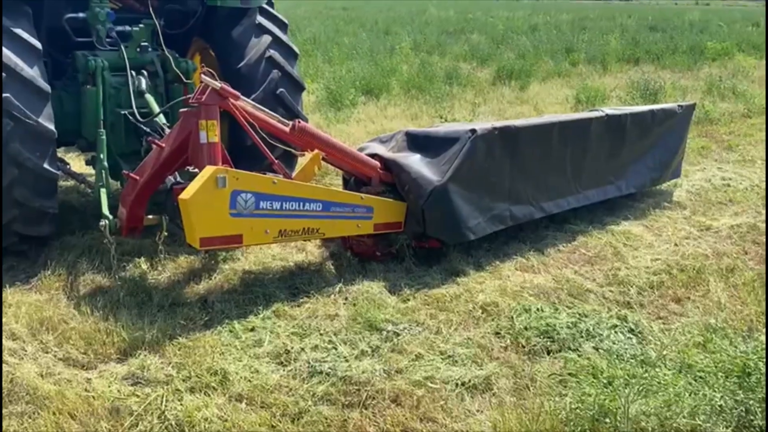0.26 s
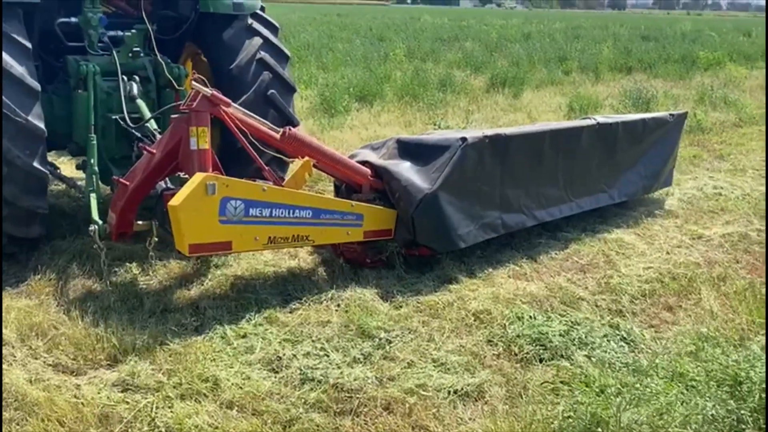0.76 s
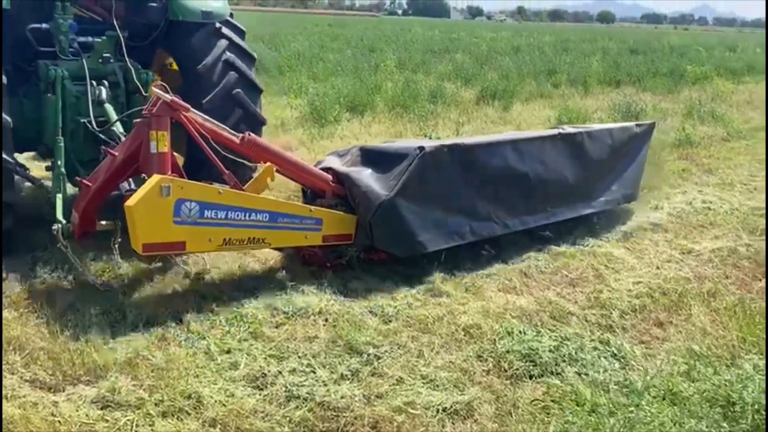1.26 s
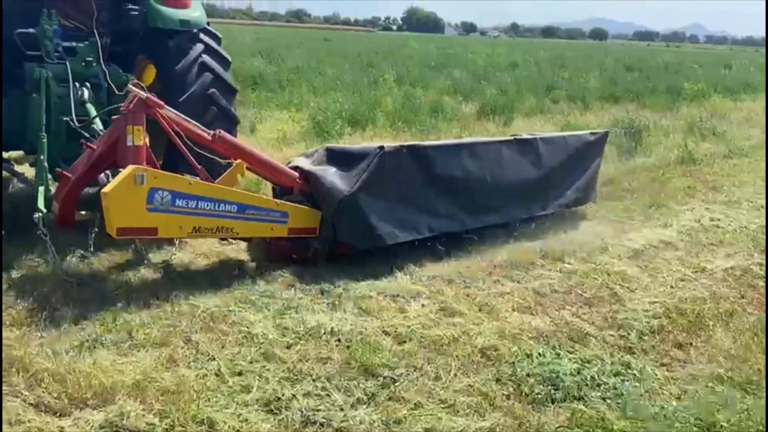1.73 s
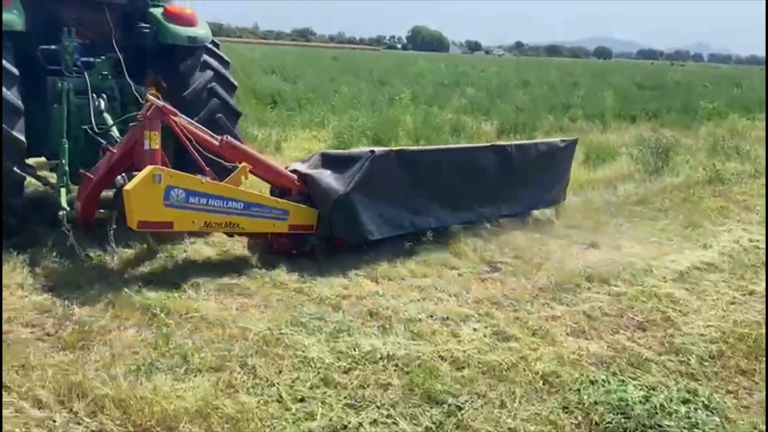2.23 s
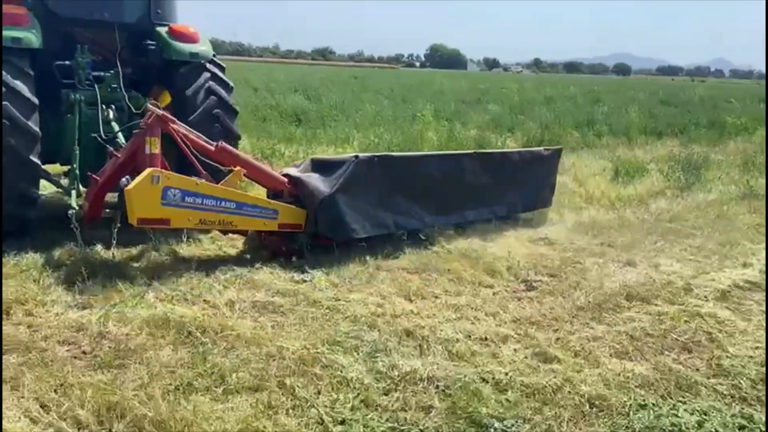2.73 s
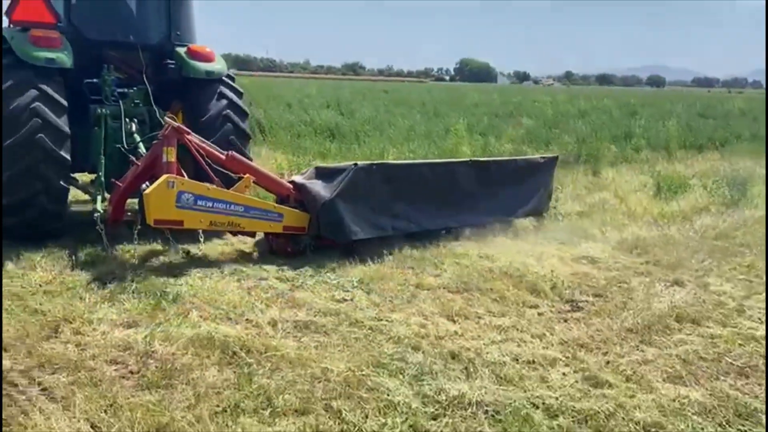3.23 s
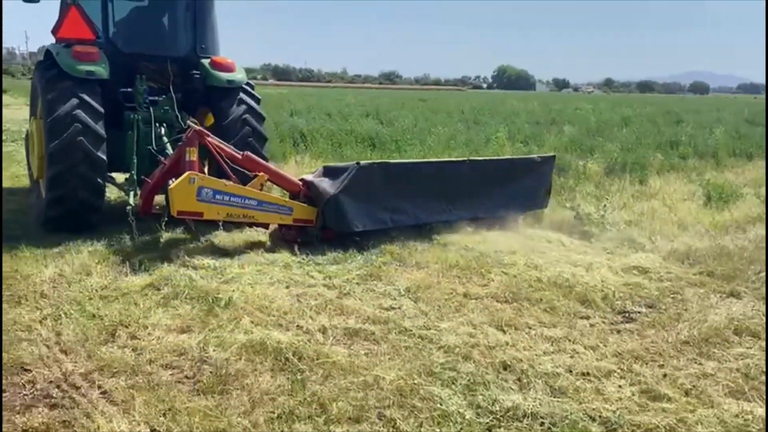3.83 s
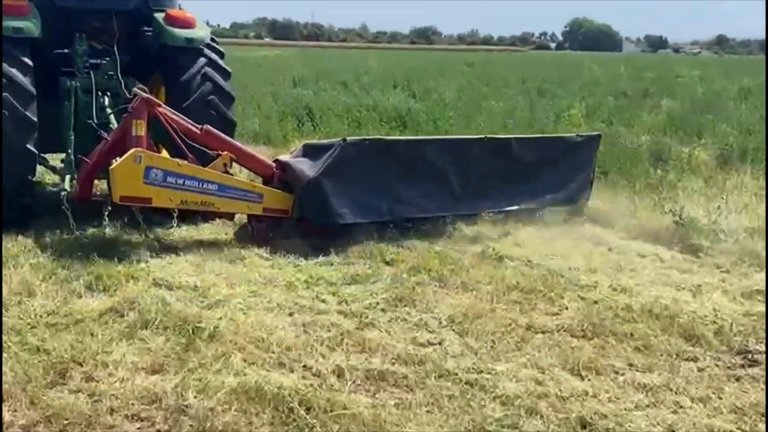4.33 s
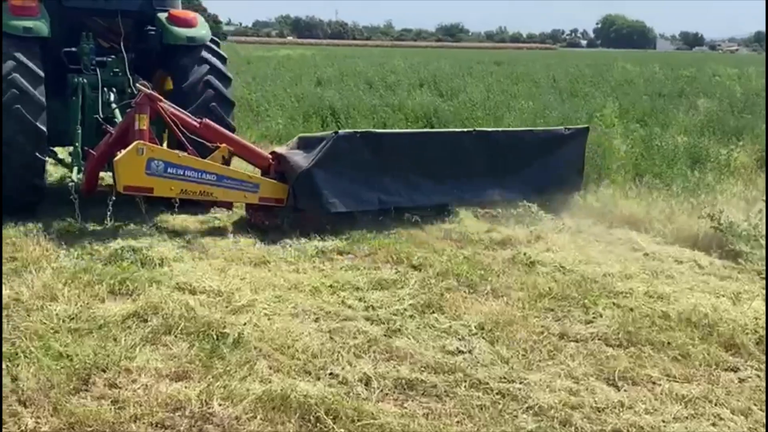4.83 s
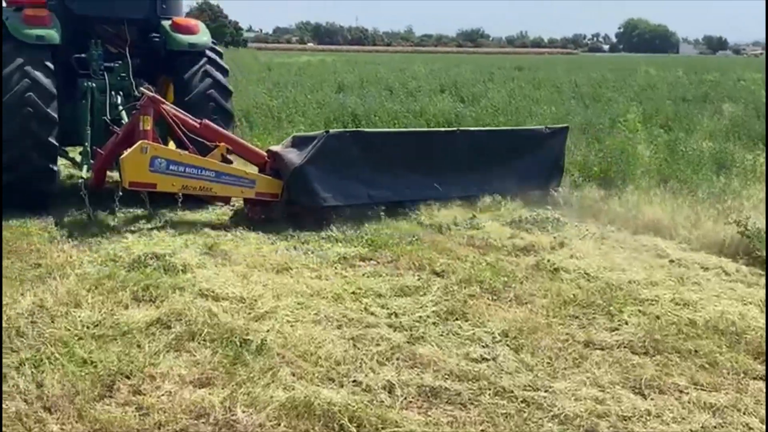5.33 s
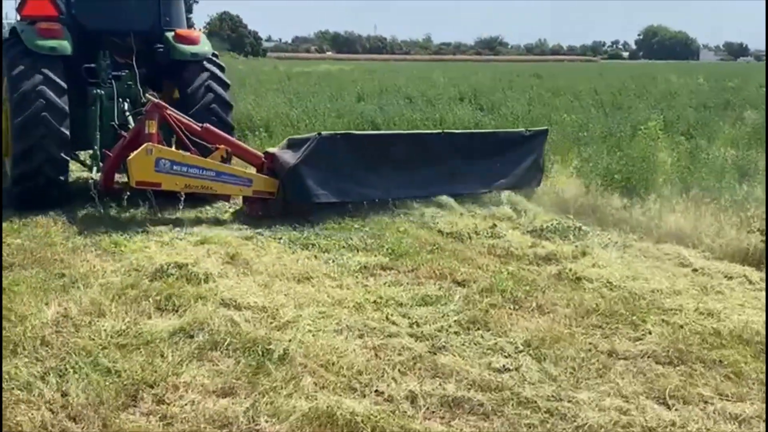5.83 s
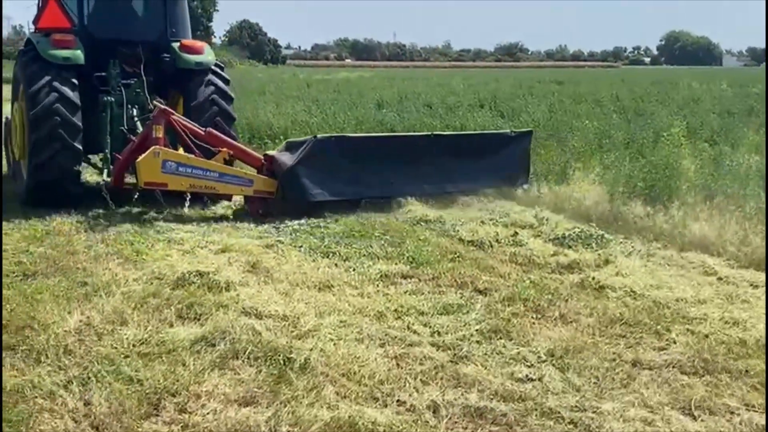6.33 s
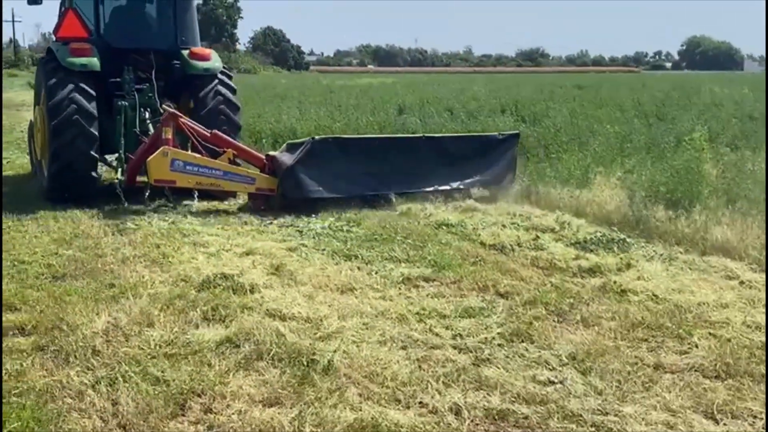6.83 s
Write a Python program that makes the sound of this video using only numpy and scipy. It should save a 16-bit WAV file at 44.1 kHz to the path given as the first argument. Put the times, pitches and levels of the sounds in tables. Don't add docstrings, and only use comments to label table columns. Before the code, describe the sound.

Continuous farm machinery noise outdoors, dry and close at first. Spinning knives beat low under a canvas hood, a muffled diesel exhaust drones, and gear teeth whine with a grainy, beating rattle. Pitch rises quickly, dips briefly near one second, then surges again before two seconds and holds. Skids scrape faintly over the ground and cut crop hisses. The mower slowly recedes, stereo narrowing after four seconds, through a phone microphone with limited highs.

```python
import sys
import numpy as np
from scipy import signal
from scipy.io import wavfile
from scipy.ndimage import uniform_filter1d, map_coordinates

SR = 44100
rng = np.random.default_rng(int(sys.argv[2]) if len(sys.argv) > 2 else 0)


def natural_amplitude(level_db):
    exponent = np.asarray(level_db, float) / 20
    return 10 ** exponent


def transcribe(signal):
    frames = np.atleast_2d(signal).T
    limited = np.clip(frames, -1, 1)
    pcm = np.round(limited * 32767).astype(np.int16)
    wavfile.write(sys.argv[1], SR, pcm)


N = 311346

# start_s, knife_pass_hz, firing_hz
THROTTLE = [(0, 49.5, 36.8), (.15, 52.5, 36.8), (.3, 54.6, 39.2), (.45, 57.7, 42.3), (.55, 60, 42.4),
            (.75, 61.7, 42.1), (.9, 61.1, 41.6), (1.15, 58.5, 40.9), (1.3, 59.2, 41.2), (1.45, 60, 44.4),
            (1.6, 63.7, 48.2), (1.75, 67.6, 50.5), (1.95, 73, 51.3), (2.15, 74.5, 52.3), (2.35, 75.4, 52),
            (2.65, 74.5, 51.8), (2.9, 74.7, 52), (3.1, 75.4, 52.1), (3.55, 74.6, 52), (3.85, 75.1, 52.3),
            (4.3, 75.3, 52.6), (4.72, 77.1, 53.7), (5.0, 76.7, 53.2), (5.2, 77, 53.8), (5.55, 78.3, 54.3),
            (5.8, 77.9, 54.4), (6.15, 79.6, 55.4), (6.55, 79.8, 55.5), (7.06, 81.2, 56.4)]
# start_s, load_db, bite_db, crop_db
WORK = [(0, 0.5, 1, 3.5), (.15, 1, 6, 4), (.33, 4, 8, 0), (.5, 0, 10, 3.5), (.75, 1, 7.5, 1),
        (.9, -1.5, 2, -1.5), (1.1, -2.5, 5, -1.5), (1.22, 0, -14, -2), (1.43, 0.5, 1.5, 0),
        (1.65, 1.2, -8, -1), (1.8, 1.5, 4, 0.5), (2.2, 0.5, 6, -0.5), (2.9, 0, 4, -0.7),
        (3.5, 0.6, 4, -1.5), (4.1, 0.5, 1, 0), (4.7, 0.3, 9, 1.5), (5.8, 0.8, 0.5, 0.3),
        (7.06, 2, 8.5, -4.5)]
NEAREST_M, LEAVES_S, DRIVES_M_S = 3.7, 1.78, 0.7
LOW_LOSS = 0.13

# multiple_of_knife_rate, level_db
UPPER_BEATS = [(2.182, -56), (3, -49), (4, -49), (5, -49), (6, -48), (8, -51)]
# pitch_hz, level_db
CANVAS = [(49, -37), (56, -42), (60, -32.5), (66, -30.5), (75, -25), (82, -28.5), (118, -35), (150, -38.5)]
HOOD_HZ, HOOD_RING_DB, HOOD_RING_HZ = 178., 12.5, 10.

MESH, PUMP, IDLER = 12.5, 18.1, 8.84
WOBBLE = .182
PUMP_DB, PUMP_SWING_DB = -40, 2.5
# steady_share_0_to_1, line_db, rattle_skirt_db, skirt_width_hz
TEETH = [
    (.05, -14, -4.5, 280.),
    (.1, -5, -3, 260.),
    (.05, -9, 3, 500.),
]
# level_db, then shares (dB per dB) of load, bite, crop, distance loss
MESH_LAW = [
    (-29, 0.24, 0.8, 0, 1.8),
    (-32.5, 0.45, 0.19, 0, 1.83),
    (-36.5, 0.95, 0.056, 0.0084, 0.18),
]
# pitch_hz, level_db
BAR = [(600, -1.5), (760, -1), (950, -0.5), (1250, -2), (1600, -1), (1850, -3.5), (2350, 3), (2800, -2)]
# start_s, line_one_shaft_turn_below_db, centre_db, line_above_db
SPLIT = [(0, -42, -36, -39), (.4, -42, -34, -36), (.65, -37, -32, -33), (.9, -39, -35, -38),
         (1.15, -45, -42, -44), (1.4, -44, -43, -41), (1.65, -39, -46, -37), (1.9, -36, -41, -34),
         (2.15, -40, -41, -35), (2.4, -40, -41, -34), (2.65, -41, -40, -38), (2.9, -47, -38, -41),
         (3.15, -42, -34, -41), (3.4, -38, -38, -39), (3.65, -45, -36, -37), (4.15, -45, -38, -39),
         (4.4, -42, -34, -43), (4.9, -37, -32, -43), (5.15, -44, -34, -38), (5.4, -46, -36, -40),
         (5.65, -46, -38, -40), (5.9, -40, -37, -37), (6.15, -40, -44, -40), (6.4, -41, -48, -43),
         (6.65, -43, -44, -37), (7.06, -39, -42, -39)]
# centre_s, length_s, level_db,
# teeth_per_knife_pass, smear_hz
SINGS = [(.22, .1, -31.5, 18.182, 10), (.48, .18, -33, 18.182, 7), (.75, .17, -33, 18.364, 7),
         (1.45, .22, -34.5, 18.182, 12), (2.6, .25, -39, 18.182, 6), (3.7, .4, -41, 18, 6),
         (3.5, .5, -43, 18.182, 6), (4.5, .25, -47, 18.182, 6), (.75, .25, -38, 8.9, 25),
         (1.9, .15, -40, 9, 9), (3.5, .5, -44, 9, 6), (6, .5, -47, 9, 6), (6.3, .7, -48, 9.182, 6),
         (2.35, .4, -37, 11.5, 6), (3.2, .35, -42, 11.5, 7), (.8, .25, -42, 13.5, 9),
         (1.4, .15, -43, 13.5, 9), (3.65, .5, -35.5, 13.5, 6), (4.3, .25, -38, 13.5, 7),
         (3.3, .5, -41, 13.046, 7), (3.7, .3, -41, 12.864, 7), (1.9, .2, -38, 12.864, 9),
         (2.55, .55, -42, 6, 6), (3.9, .5, -48, 6, 6), (.2, .2, -35.5, 4, 7), (6.7, .5, -47, 4, 6),
         (3.5, .5, -41, 25, 12), (.6, .2, -39, 25, 60), (1.9, .15, -43, 8, 9), (1.8, .12, -33, 2.55, 25),
         (2.7, .6, -42, 25, 80), (2.6, .3, -41, 37.5, 120), (1.551, 0.27, -28, 37.5, 930),
         (1.8, 0.17, -32.5, 28, 200), (1.85, .25, -36, 25, 120)]
STRAND_DB, STRAND_HZ, STRAND_RATE = 2.2, 110., 14.

# pitch_hz, level_db
PIPE = [(36, -39), (47, -29.5), (54, -32), (72, -33.5), (78, -24), (83, -31.5), (90, -28.5), (99, -28),
        (105, -47)]

# centre_s, length_s, level_db, pitch_hz
SCRAPES = [
    (1.75, 0.03, -33, 430),
    (1.84, 0.1, -32, 590.),
    (3.4, 0.46, -30.5, 1070),
    (4.1, 0.13, -34, 740),
    (3.6, 0.27, -32, 830.),
    (0.046, 0.083, -31, 1400),
]

# pitch_hz, level_db
RUMBLE = [(25, -42), (45, -5), (110, -5.5), (175, -5), (230, -6.5), (330, -6.5), (480, -8.5), (700, -22.5),
          (1200, -36.5)]
CLATTER = [(250, -55), (500, -3), (750, 1.5), (1100, -0.5), (1500, -3.5), (2000, -4), (2600, -11),
           (3500, -42), (6000, -40)]
WIND = [(1200, -53), (2200, -2), (2900, 4.5), (3300, 1.5), (4000, -0.5), (4700, 2), (5500, -8),
        (7000, -10.5), (9000, -88)]
HISS = [(3500, -11), (5500, -3.5), (6500, -1), (8000, -6), (9500, -7), (10500, -18), (11700, -18.5),
        (12000, -71)]
# level_db, then shares (dB per dB) of load, bite, crop, distance loss
RUSH_LAW = [
    (-32, 1, 0, 0.067, 0.67),
    (-25, 0.73, 0.016, 0.35, 0.85),
    (-28, 0.09, 0, 0.63, -0.045),
    (-38.5, 0.69, 0.041, 0.027, -0.25),
]
HISS_DB_PER_OCTAVE = 3
# centre_s, length_s, extra_hiss_db
TUFTS = [
    (1.781, 0.13, 2.5),
    (2.102, 0.27, 0),
    (3.13, 0.2, 0.5),
    (4.49, 0.021, -1),
]

# start_s, echo_lag_ms, echo_share_0_to_1, width_db, left_lead_0_to_1
PLACE = [(0, 0.412, 0.37, 2.5, 0.27), (0.4, 0.38, 0.23, 1.5, 0.27), (1.05, 0.38, 0.12, 1.5, 0.2),
         (1.35, 0.49, 0, 3.5, 0.1), (2, 0.41, 0.06, 1.5, 0.22), (3, 0.41, 0.02, 1, 0.16),
         (4.1, 0.424, 0.44, -1.5, 0.1), (4.25, 0.44, 0.32, -11, 0.1), (5.5, 0.42, 0.44, -13.5, 0),
         (7.06, 0.42, 0.45, -10, 0.02)]
# pitch_hz, level_db
SIDE_DB = [(60, -38.5), (200, -19), (640, -16), (1150, -10.5), (2070, -4.5), (3740, -11.5), (5000, -7),
           (6300, -11.5), (7300, -22)]

# low_hz, high_hz
FLIP_HZ = (8123, 9890)
TOP_HZ = 11740
# centre_s, half_length_s, above_hz, share_0_to_1
AGREE = [
    (3.218, .012, 8900, .4),
    (4.496, .012, 8200, .9),
]
# centre_s, half_length_s, above_hz
GAPS = [
    (.255, .04, 9400),
    (4.62, .025, 10600),
    (4.12, .02, 10300),
    (6.28, .02, 10500),
]
# pitch_hz, level_db
SIDE_FLOOR = [(100, -6), (300, -17), (1000, -16), (3000, -13), (4000, -5), (6300, -3), (7100, 3),
              (8000, -8), (10000, -6)]
MID_FLOOR = [(100, -40), (2500, -16), (5000, -11), (7500, -8), (8100, -3), (8500, 3), (9000, 2),
             (9800, 4.5), (10400, -1), (11800, 0)]
FRAME_LEAD = 394
FRAME = signal.windows.kaiser_bessel_derived(2 ** 11, 4 * np.pi)


def curves(table):
    s, *columns = np.transpose(table)
    return [np.interp(np.arange(N) / SR, s, c) for c in columns]


def unit(x):
    return x / np.sqrt(np.mean(x ** 2))


def shape(points, hz):
    point_hz, point_db = np.array(points).T
    return natural_amplitude(np.interp(np.log(hz + 1), np.log(point_hz), point_db))


def swell(at, length):
    return np.exp(-((np.arange(N) / SR - at) / length) ** 2)


def walk(rate):
    hold = int(SR / rate)
    steps = np.repeat(rng.standard_normal(N // hold + 1), hold)
    return unit(uniform_filter1d(uniform_filter1d(steps, hold), hold)[:N])


def patches(hz, s, step_hz, rate):
    grid = np.meshgrid(hz / step_hz, rate * s, indexing="ij")
    return 1.5 * map_coordinates(rng.standard_normal((300, 400)), grid, order=1, mode="wrap")


def tone(turns, db):
    return np.sqrt(2) * natural_amplitude(db) * np.sin(2 * np.pi * turns)


def whine(turns, clean, width_hz):
    clean, angle = np.clip(clean, 0, 1), 2 * np.pi * turns
    in_step = np.sqrt(2 * clean) + np.sqrt(1 - clean) * walk(width_hz)
    return in_step * np.cos(angle) - np.sqrt(1 - clean) * walk(width_hz) * np.sin(angle)


def rush(points, patchy_db, rate):
    hz, s, z = signal.stft(rng.standard_normal(N), SR, nperseg=2 ** 10)
    grid = np.meshgrid(3 * np.log2(hz / 20 + 1), rate * s, indexing="ij")
    flicker = map_coordinates(rng.standard_normal((40, 300)), grid, order=1)
    z = z * shape(points, hz)[:, None] * natural_amplitude(patchy_db * flicker)
    return unit(signal.istft(z, SR, nperseg=2 ** 10)[1][:N])


def work():
    gone_m = DRIVES_M_S * np.maximum(np.arange(N) / SR - LEAVES_S, 0)
    return np.array(curves(WORK) + [-20 * np.log10(1 + gone_m / NEAREST_M)])


def follow(laws):
    controls = work()
    return [db + np.dot(shares, controls) for db, *shares in laws]


def through(points, hz):
    return 20 * np.log10(shape(points, hz)) + LOW_LOSS * work()[-1]


def knives(turns, hz):
    beat_db = through(CANVAS, hz) + .7 * walk(3) + 0.25 * walk(15)
    second_db = through(CANVAS, 2 * hz) + 1 + 1.2 * walk(5)
    out = tone(turns, beat_db) + tone(2 * turns, second_db)
    for k, db in UPPER_BEATS:
        ring_db = HOOD_RING_DB * np.exp(-((k * hz - HOOD_HZ) / HOOD_RING_HZ) ** 2)
        out = out + tone(k * turns, db + 1.5 * walk(4.3) + ring_db)
    return out


def mesh_levels(knife_hz):
    return [db + 20 * np.log10(shape(BAR, (k + 1) * MESH * knife_hz))
            for k, db in enumerate(follow(MESH_LAW))]


def gears(turns, mesh_db):
    pump_db = PUMP_DB + PUMP_SWING_DB * walk(2.86)
    rock = np.cos(2 * np.pi * WOBBLE * turns)
    jolt = .45 * walk(2.5) * np.cos(2 * np.pi * turns + walk(3.))
    jolt = jolt + .35 * walk(2.5) * np.cos(np.pi * turns)
    beads = 1 + .6 * rock + jolt
    fading_db = .6 * (mesh_db[1] + 38)
    side_gain = natural_amplitude(pump_db + fading_db - 8)
    out = side_gain * whine(PUMP * turns, .05, width_hz=45.)
    out = out + side_gain * whine(IDLER * turns, 0.11, width_hz=25.)
    for k, (db, (clean, line_db, skirt_db, skirt_hz)) in enumerate(zip(mesh_db, TEETH), 1):
        teeth = k * MESH * turns
        out = out + natural_amplitude(db + line_db) * beads * whine(teeth + 0.03 * rock, clean, width_hz=28. * k)
        out = out + natural_amplitude(db + skirt_db) * whine(teeth, 0, skirt_hz)
    out = out + natural_amplitude(fading_db - 37.5) * whine(4 * MESH * turns, 0, width_hz=300.)
    return out + natural_amplitude(fading_db - 55.) * whine(5 * MESH * turns, 0, width_hz=380.)


def mesh_lines(turns):
    return sum(tone((MESH + k * WOBBLE) * turns + .015 * walk(4.), db + 1.2 + 1.1 * walk(9.))
               for k, db in zip((-1, 0, 1), curves(SPLIT)))


def sings(turns):
    return sum(natural_amplitude(db) * swell(at, length) * whine(teeth * turns, 6 / smear_hz, smear_hz)
               for at, length, db, teeth, smear_hz in SINGS)


def exhaust(turns, hz):
    first_db = through(PIPE, hz) + .8 * walk(4.5) + 0.44 * walk(25)
    second_db = through(PIPE, 2 * hz) + .8 * walk(5.6) + 0.74 * walk(24)
    return tone(turns, first_db) + tone(2 * turns, second_db)


def skids():
    return sum(natural_amplitude(db) * swell(at, length) * whine(hz * np.arange(N) / SR, 0, width_hz=150.)
               for at, length, db, hz in SCRAPES)


def rushes(knife_turns, knife_hz, firing_turns):
    rumble_db, clatter_db, wind_db, hiss_db = follow(RUSH_LAW)
    hiss_db = hiss_db + HISS_DB_PER_OCTAVE * np.log2(knife_hz / 75)
    hiss_db = hiss_db + sum(db * swell(at, length) for at, length, db in TUFTS)
    shake_db = 0.11 * walk(23) + 0.3 * np.cos(2 * np.pi * WOBBLE * knife_turns)
    knock = 1 + 0.048 * np.cos(2 * np.pi * firing_turns)
    swish = 1 + 0.084 * np.cos(2 * np.pi * knife_turns)
    hood_db = 1.13 * (rumble_db + 35.5) - 42.5
    hood = natural_amplitude(hood_db) * whine(HOOD_HZ * np.arange(N) / SR, 0, width_hz=30.)
    rumble = natural_amplitude(rumble_db + 1.37) * rush(RUMBLE, patchy_db=3.5, rate=8.)
    clatter = natural_amplitude(clatter_db + 0.34 + shake_db) * knock * rush(CLATTER, patchy_db=1.5, rate=24.)
    wind = natural_amplitude(wind_db + 1.78 + shake_db) * swish * rush(WIND, patchy_db=1., rate=24.)
    hiss = natural_amplitude(hiss_db + 3.5 + 0.3 * walk(24)) * rush(HISS, patchy_db=1.5, rate=22.)
    return hood + rumble + clatter + wind + hiss


def ground_echo(x, lag_ms, share):
    echo = np.interp(np.arange(N) - lag_ms * SR * 0.000999, np.arange(N), x)
    echo = signal.sosfilt(signal.butter(1, [900., 5500.], "band", fs=SR, output="sos"), echo)
    return x - share * echo, np.sqrt(1 + share ** 2)


def strands(x):
    hz, s, z = signal.stft(x, SR, nperseg=2 ** 10)
    depth_db = STRAND_DB * np.clip(hz / 1500., 0, 1)[:, None]
    colour_db = depth_db * patches(hz, s, STRAND_HZ, STRAND_RATE) - depth_db ** 2 / 9
    return signal.istft(z * natural_amplitude(colour_db), SR, nperseg=2 ** 10)[1][:N]


def widen(mid, width_db, lead):
    hz, s, z = signal.stft(mid, SR, nperseg=2 ** 10)
    at = np.minimum(s * SR, N - 1).astype(int)
    paths = patches(hz, s, step_hz=92.4, rate=22.) + 1j * patches(hz, s, step_hz=86.4, rate=22.)
    paths = paths / np.sqrt(2) + lead[at] * np.exp(-1j * hz / 17000.)[:, None]
    z = z * paths * shape(SIDE_DB, hz)[:, None] * natural_amplitude(width_db[at])
    return signal.istft(z, SR, nperseg=2 ** 10)[1][:N]


def starve(z, hz, s, floor):
    band = uniform_filter1d(abs(z) ** 2, size=4, axis=0)
    usual = uniform_filter1d(band.mean(axis=1), size=45)
    floor = shape(floor, hz)[:, None] * natural_amplitude(2.5 * patches(hz, s, step_hz=220., rate=30.))
    kept = z * (band > usual[:, None] * floor ** 2)
    return signal.istft(kept, SR, FRAME, nperseg=2 ** 11)[1][FRAME_LEAD:FRAME_LEAD + N]


def scene():
    knife_hz, firing_hz = curves(THROTTLE)
    turns, firings = np.cumsum(knife_hz) / SR, np.cumsum(firing_hz) / SR
    lag_ms, share, width_db, lead = curves(PLACE)
    rattle = gears(turns, mesh_levels(knife_hz)) + sings(turns) + skids()
    rattle = rattle + rushes(turns, knife_hz, firings)
    echoed, gain = ground_echo(rattle, lag_ms, share)
    mid = knives(turns, knife_hz) + mesh_lines(turns) + exhaust(firings, firing_hz) + strands(echoed) / gain
    side = widen(mid, width_db, lead)
    return np.array([mid + side, mid - side])


def top_cut(x):
    return signal.sosfilt(signal.butter(12, 12780, fs=SR, output="sos"), x)


def record(dry):
    early = np.pad(dry, ((0, 0), (FRAME_LEAD, 0)))
    hz, s, (left, right) = signal.stft(early, SR, FRAME, nperseg=2 ** 11)
    s = s - FRAME_LEAD / SR
    low_hz, high_hz = FLIP_HZ
    flip = np.clip((hz - low_hz) / 1000. + .5, 0, 1) * np.clip((high_hz - hz) / 1000. + .5, 0, 1)
    flip = np.pi / 2 * flip[:, None]
    agree = sum(share * np.outer(hz > above_hz, abs(s - at) < length)
                for at, length, above_hz, share in AGREE)
    gaps = sum(np.outer(hz > above_hz, abs(s - at) < length) for at, length, above_hz in GAPS)
    mid = (left + right) / 2 * (hz < TOP_HZ)[:, None] * (1 - gaps)
    side = (left - right) / 2 * (hz < low_hz)[:, None]
    side = starve(side + 1j * mid * np.sin(flip), hz, s, SIDE_FLOOR)
    mid = starve(mid * np.maximum(np.cos(flip), agree), hz, s, MID_FLOOR)
    return top_cut(np.array([mid + side, mid - side]))


dry = scene()
out = record(dry)
transcribe(out)
```